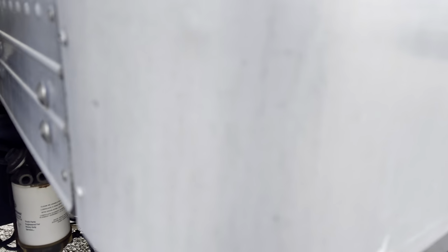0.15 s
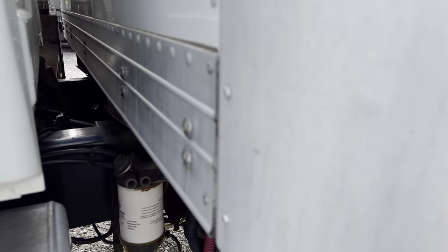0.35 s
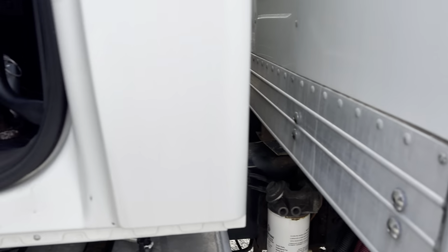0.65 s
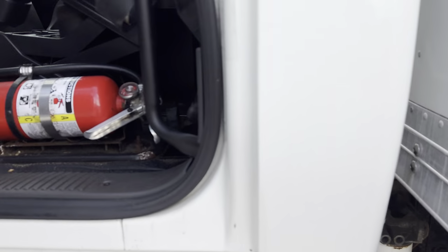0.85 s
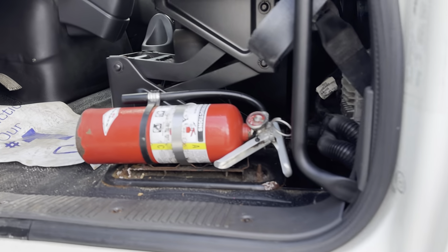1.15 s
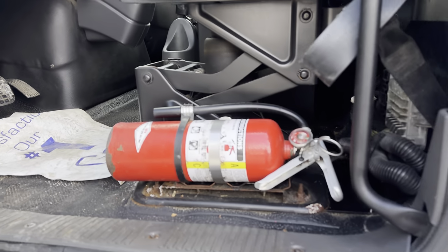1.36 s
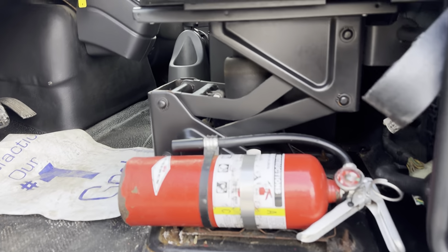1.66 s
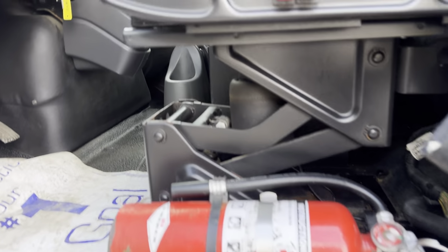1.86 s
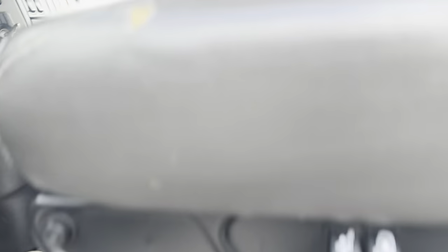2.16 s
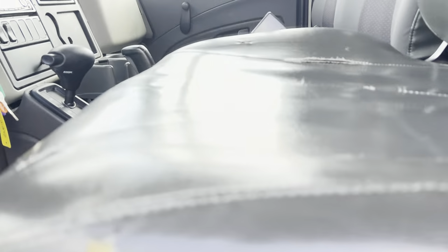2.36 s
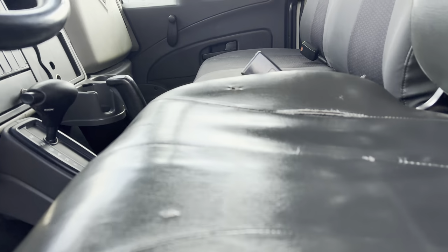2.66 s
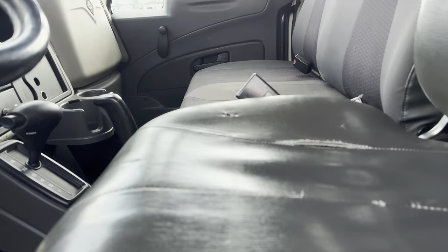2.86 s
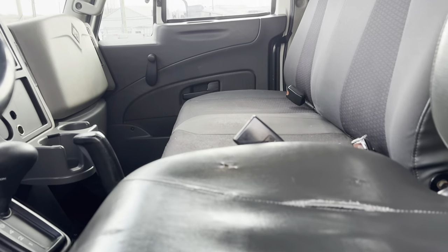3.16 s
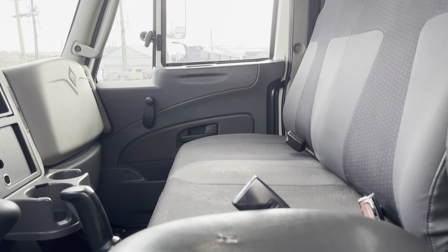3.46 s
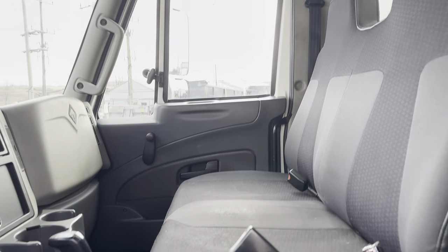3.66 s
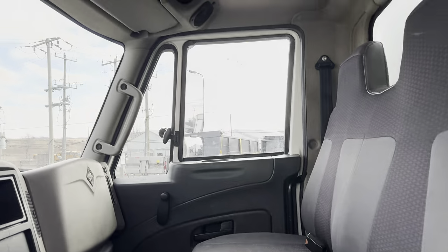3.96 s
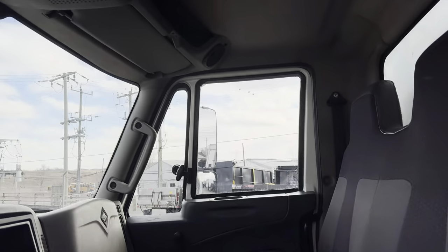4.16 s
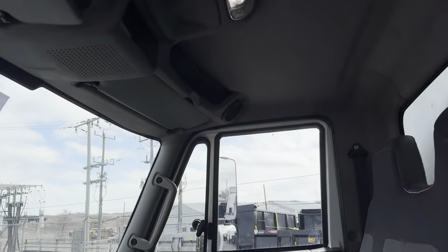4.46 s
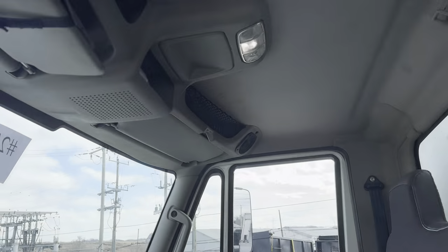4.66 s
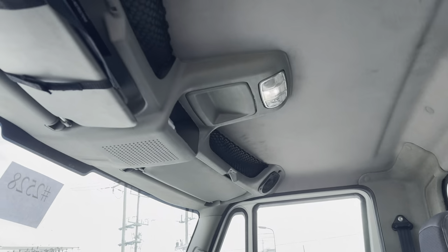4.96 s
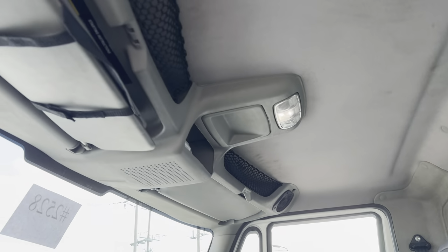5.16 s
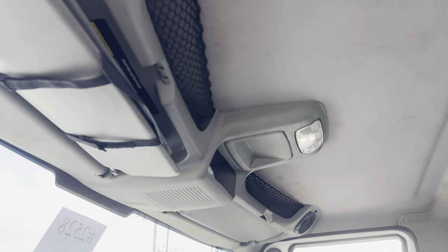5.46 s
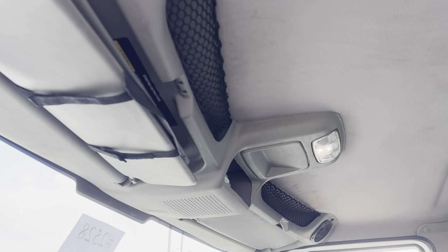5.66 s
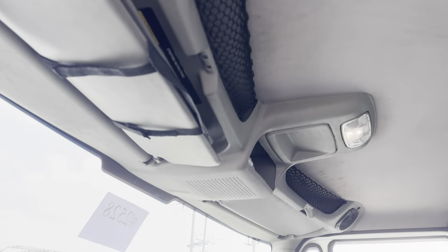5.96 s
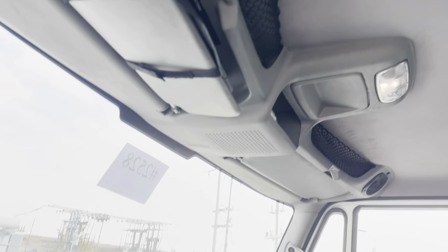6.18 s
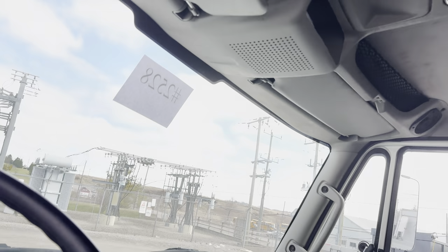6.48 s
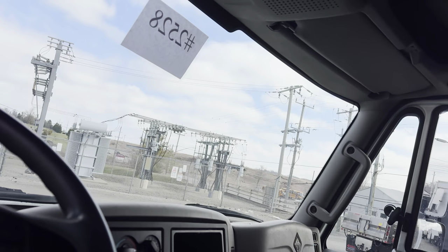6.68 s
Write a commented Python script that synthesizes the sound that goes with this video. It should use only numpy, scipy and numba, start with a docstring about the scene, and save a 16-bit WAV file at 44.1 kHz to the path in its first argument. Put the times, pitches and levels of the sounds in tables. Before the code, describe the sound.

A six-cylinder diesel idles steadily throughout, its firings a fast, uneven rattling roar at about 47 per second, with clatter, sizzle and a grainy high pulley hiss. At 0-0.2 s a wind burst rumbles and pops; light knocks on bodywork tap at 0.12-0.33 s, the strongest at 0.2. Around 0.6-1.6 s, passing an open gap, gear whines on the right and fan hum stand out, with a few harder diesel knocks at 1.04-1.24. Short gusts flutter at 1.5 and 1.8. From 2 to 2.8 s faint high belt chirps squeak far left. By 3 s the sound is inside the cab: darker, with low boom and softer clatter. Gusts pop at 3.4, 3.8 and 4.05. A thin bright click at 4.57 leads into the heaviest buffeting, 4.6-5.25, ended by dull, scuffing microphone bumps at 5.27-5.31. Afterwards comes calm muffled idle, with slight wind, to 6.8 s.

```python
"""A six-cylinder diesel truck idles on an open lot; a hand-held stereo microphone goes from beside it into the cab.
Engine: noise pulsed by the firings gives roar, clatter and sizzle, coloured by the open air and then by the cab.
Fan, whines of gears and cab, cab boom and transformers are wavering tones; a belt chirps and its pulley hisses.
Wind is filtered noise in gusts, with single eddies popping on the ports. Light knocks come at the start,
one sharp click sounds in the cab, and dull bumps on the housing end the strongest gust."""
import sys
import numpy as np
from scipy import signal
from scipy.fft import rfft, irfft
from scipy.io import wavfile
from scipy.ndimage import uniform_filter1d
from numba import njit

SR = 44100
rng = np.random.default_rng(int(sys.argv[2]) if len(sys.argv) > 2 else 0)


def dump(signal):
    """Clip the signal to [-1, 1] and save it as 16-bit WAV at the path in sys.argv[1]."""
    limited = np.clip(np.atleast_2d(signal).T, -1, 1)
    pcm = np.round(limited * 32767).astype(np.int16)
    wavfile.write(sys.argv[1], SR, pcm)


N = 300762
TIME = np.arange(N) / SR  # s
FREQS = np.maximum(np.arange(N // 2 + 1) * SR / N, 1)  # Hz

# Colours are spectrum shapes: only the differences between their levels count.
# Decays are times to fall by 60 dB.

# how alike the two microphone ports hear a spread source: pitch_hz, correlation (-1 to 1)
PORT_LIKENESS = [(60, 0.75), (320, 0.8), (480, 0.04), (750, -0.5), (950, 0.1), (1150, 0.46), (1700, -0.36),
                 (2400, 0.4), (3100, 0), (4300, 0.25), (6600, -0.2), (8600, -0.84), (12000, -0.23),
                 (15600, 0.5)]
# how a spread source leans to the left port: pitch_hz, left_minus_right_db
PORT_LEAN = [(100, 1.5), (330, 4), (520, 3), (750, 5), (1400, 3.5), (2400, -0.5), (3400, 4.5), (5200, 6),
             (6200, 4), (7300, 7.5), (9000, 0.5)]

# transformers near the lot
MAINS_HUM_HZ, MAINS_HUM_DB = 119.9, -39

# light breeze between gusts, weaker in the shelter of the doorway: time_s, level_db
BREEZE = [(0, -24), (2.0, -43), (2.2, -40), (3.1, -30), (3.3, -30.5), (5.3, -26), (5.6, -48), (6.82, -31)]
BREEZE_SWING_DB, BREEZE_HZ = -0.5, 139  # random swing; eddy corner
# gusts on the microphone: full_strength_s, hold_s, level_db, eddy_corner_hz
GUSTS = [(0.01, 0.18, -20.5, 250), (0.455, 0.014, -24.5, 130), (0.56, 0.049, -25.5, 217),
         (0.978, 0.025, -26, 150), (1.194, 0.42, -28, 312), (1.508, 0.063, -22, 241),
         (1.764, 0.28, -22.5, 250), (3.203, 0.52, -24.5, 129), (3.436, 0.02, -23, 78),
         (3.784, 0.043, -21.5, 128), (4.048, 0.084, -28.5, 144), (4.26, 0.53, -24, 99),
         (4.66, 0.064, -15, 198), (4.75, 0.4, -17, 90), (4.841, 0.17, -13, 200), (5.098, 0.088, -14, 176),
         (5.22, 0.075, -18.5, 210), (5.892, 0.032, -28.5, 130), (6.376, 0.32, -28.5, 106)]
GUST_ATTACK_S, GUST_RELEASE_S = 0.056, 0.023  # ramp ahead of full strength; fall by a factor e
# colour of eddies that push both ports alike: pitch_hz, level_db
SHARED_EDDIES = [(20, -15), (40, -9.5), (65, 4.5), (125, -1.0), (220, -3.0), (400, -1.0), (700, -4.0),
                 (5000, -22.5)]
# colour of eddies that push the ports opposite ways: pitch_hz, level_db
APART_EDDIES = [(20, -45), (40, -39), (65, -6.0), (120, -11.0), (400, -7.0), (800, 3.5), (1500, -29.5),
                (5000, -19)]
# single eddies popping on the ports: centre_s, pitch_hz, level_db, length_s
POPS = [(0.025, 250, -15, 0.036), (0.079, 333, -16.5, 0.019), (0.118, 100, -12.5, .022),
        (1.512, 130, -12, 0.05), (1.537, 190, -12, .012), (1.571, 310, -9.5, 0.016),
        (1.881, 350, -14, 0.023), (3.448, 76, -6.5, .04), (3.811, 148, -10.5, 0.023),
        (4.056, 148, -11.5, 0.029), (4.832, 327, -11.5, 0.014), (4.878, 410, -7.5, 0.011),
        (4.904, 100, -12, 0.025), (4.995, 90.5, -4, 0.029), (5.12, 75, -7, 0.058), (5.16, 282, -9.5, 0.028),
        (5.184, 264, -6.5, 0.011), (5.871, 275, -23.5, 0.019), (6.593, 240, -25, 0.026),
        (6.665, 276, -25.5, 0.022)]

# dull bumps against the microphone's housing: start_s, level_db, contact_s
BUMPS = [(5.268, -15, .0008), (5.276, -6, 0.00095), (5.289, -8, 0.0026), (5.298, -9, 0.0013),
         (5.309, -3.5, 0.0039)]
# modes of the housing: pitch_hz, relative level_db, decay_s
HOUSING = [(102, -5, .065), (237, 2, 0.031), (402, 1, 0.052), (560, -1, 0.043), (740, -7, 0.058),
           (1100, -4, 0.022)]
# scuffs that go with two of the bumps: start_s, level_db, decay_s
SCUFFS = [(5.2745, -7.5, 0.062), (5.297, -13.5, 0.041)]
# colour of the scuffs: pitch_hz, level_db
SCUFF_COLOUR = [(40, -22), (120, -1), (350, 12), (650, 0.5), (1100, -11), (1500, -13), (2400, -23.5),
                (4000, -44), (8000, -76)]

# a soft scuff, then light knocks on the bodywork: start_s, level_db, decay_s
KNOCKS = [(0.123, -30, 0.25), (0.165, -24, 0.099), (.2065, -18, 0.075), (.33, -35, .2)]
# colour of the knocks: pitch_hz, level_db
KNOCK_COLOUR = [(150, 16.5), (500, 3), (1000, -3), (1800, 2), (2700, -4.5), (4500, -8), (7500, -13),
                (9500, -28), (15000, -31)]
# the one click inside the cab
CLICK_S, CLICK_DB, CLICK_DECAY_S = 4.569, -34.5, 0.11
# colour of the click: pitch_hz, level_db
CLICK_COLOUR = [(2500, -30), (4300, 1), (6000, -8), (8500, -6), (11500, 2), (14000, -3.5), (16000, -3.5)]

# belt chirps: start_s, pitch_hz (mid-chirp), level_db (before panning), rise (share of the pitch)
CHIRPS = [(1.98, 4060, -53, .03), (2.1, 4120, -56, .04), (2.212, 3900, -50, .1), (2.324, 3860, -55, .07),
          (2.355, 3950, -53, .02), (2.462, 3960, -50, 0.11), (2.598, 3600, -57, .12),
          (2.74, 4000, -54, .15)]
# whining tones of gears and cab: pitch_hz, relative level_db
WHINES = [(524, -7.5), (570.3, -8.5), (691, -8.5), (1140, -16.5), (1234, -11.5), (1260, -17), (2114, -23)]
# the whines are heard plainly only while passing the open gap behind the cab
GAP_S, GAP_HALF_WIDTH_S, WHINES_GAP_DB, WHINES_DB = 1.03, 0.56, -34, -48
FAN_HZ = 156.8
# fan, loud by the gap and over the cab floor, faint under the roof: time_s, blade_db, octave_db
FAN_LEVEL = [(0, -46, -54), (.55, -44, -46), (.8, -40.5, -30.5), (1.3, -25.5, -26.5), (1.62, -39, -31.5),
             (1.85, -48, -32), (2.1, -46, -46), (2.35, -30.5, -35.5), (3.0, -33, -42.5), (3.6, -34.5, -51),
             (5.2, -38.5, -57), (5.6, -55, -67), (6.82, -51, -50)]
FIRING_HZ = 47.5
# cab standing waves, strongest at seat height: time_s, firing_tone_db, octave_db
BOOM_LEVEL = [(0, -46, -45), (1.75, -50, -38), (2.0, -48, -39), (2.27, -56, -43), (2.55, -30.5, -26.5),
              (3.1, -28, -29), (3.4, -26, -26.5), (4.7, -28, -32.5), (5.65, -35, -44), (6.1, -37, -47),
              (6.45, -35, -28.5), (6.82, -34, -41)]

# the walk along the truck and in through the door: time_s, engine reference level_db, inside_cab (0 to 1)
WALK = [(0, -35.5, .03), (.55, -35.5, 0.01), (1.15, -34.5, 0.03), (1.6, -36, 0.02), (2.3, -40.5, 0.24),
        (3.25, -42, 0.98), (4.2, -41, 0.97), (5.15, -40.5, 0.84), (5.7, -39, 1), (6.82, -42, 0.9)]
CLATTER_DB, CLATTER_CAB_DB = -8, -4.5  # against the engine reference; what the cab adds to that
# engine roar beside the truck: pitch_hz, level_db per Hz
ROAR_OUTSIDE = [(30, -44), (55, -38), (120, -0.5), (220, -11.5), (310, -2.5), (450, -11.5), (650, -18.5),
                (950, -14.5), (1300, -13), (1800, -21.5), (2400, -22.5), (3200, -33.5), (4200, -51)]
# engine roar in the cab: pitch_hz, level_db per Hz
ROAR_CAB = [(25, -28.5), (48, 8), (75, 6.5), (145, 5.5), (220, -3.5), (330, -5), (450, -10), (700, -11),
            (980, -9.5), (1300, -10), (1800, -20.5), (2250, -21), (3100, -28.5), (4200, -52.5)]
# clatter of injectors and valves: pitch_hz, level_db per Hz
CLATTER = [(1800, -38), (2600, -3), (3300, -2.5), (4100, 0.5), (4600, 2.5), (5200, -4.5), (5700, -7),
           (6300, -3.5), (7200, -6), (7900, -7), (8800, -23), (10000, -40)]
# sizzle above the clatter: pitch_hz, level_db per Hz
SIZZLE = [(6500, -27), (8500, -10.5), (10500, -11.5), (13000, -6.5), (15500, -3.5)]
# hollow ring of the bodywork, shifting as the microphone moves: time_s, centre_hz, level_db
HOLLOW = [(0, 560, -38), (.6, 580, -41), (.8, 565, -35), (1.3, 590, -32.5), (2.1, 574, -36.5),
          (3.3, 554, -44), (5.3, 565, -40.5), (5.8, 550, -69), (6.05, 536, -49), (6.42, 524, -37.5),
          (6.82, 567, -41.5)]
HOLLOW_OVERTONE, HOLLOW_OVERTONE_DB = 1.453, -1  # ratio to the centre; level against it
# firings that knock harder than the rest: start_s, level_db
HARD_FIRINGS = [(1.041, -27), (1.165, -20), (1.243, -17)]
# colour of the hard firings: pitch_hz, level_db
HARD_COLOUR = [(200, -20), (550, 10), (900, -4), (1400, -1), (2500, -32), (4500, -27), (9000, -48)]
HARD_DECAY_S = 0.04

TOP_HZ = 15850  # top of the recorder's band


def undb(db):
    """Decibels to gain."""
    return 10 ** (np.asarray(db) / 20)


def curves(table):
    """Each column of a table as a course in time, joined by straight lines."""
    s, *columns = np.transpose(table)
    return [np.interp(TIME, s, c) for c in columns]


def over_hz(points):
    """Points joined on a log-frequency axis."""
    hz, value = np.transpose(points)
    return np.interp(np.log(FREQS), np.log(hz), value)


def unit(x):
    """Scale to rms 1."""
    return x / np.sqrt(np.mean(x ** 2))


def walk(rate):
    """Random course of rms 1: levels held 1 / rate s and slewed twice."""
    k = int(SR / rate)
    held = np.repeat(rng.standard_normal(N // k + 1), k)
    slewed = uniform_filter1d(uniform_filter1d(held, k), k)
    return unit(slewed[:N])


def pan(x, lean_db):
    """Place a sound between left and right; a positive lean is to the left."""
    return x * undb(np.array([[lean_db], [-lean_db]]) / 2)


def ports(pair, colour):
    """Colour two unrelated noises and spread them over the ports; the centre keeps rms 1."""
    mid, side = rfft(pair) * undb(over_hz(colour))
    likeness = np.clip(over_hz(PORT_LIKENESS), -.9, .99)
    side = side * np.sqrt((1 - likeness) / (1 + likeness))
    lean = undb(over_hz(PORT_LEAN) / 2)
    out = irfft(np.array([(mid + side) * lean, (mid - side) / lean]), N)
    return out / np.std(out.mean(axis=0))


@njit
def low_pass(x, hz, damping):
    """State-variable low-pass with a moving corner."""
    y, band, low = np.empty(len(x)), 0., 0.
    for i in range(len(x)):
        g = np.tan(np.pi * hz[i] / SR)
        v = (band + g * (x[i] - low)) / (1 + g * (g + damping))
        y[i] = low + g * v
        band, low = 2 * v - band, low + 2 * g * v
    return y


def strike(s, db, decay_s, colour, rise_s):
    """A contact: a dense ring that builds over the time of the push and dies away."""
    age = np.maximum(TIME - s, 0)
    push = np.sin(np.pi / 2 * np.minimum(age / rise_s, 1)) ** 2
    fall = np.exp(-np.log(1000) * age / decay_s)
    return undb(db) * push * fall * ports(rng.standard_normal((2, N)), colour)


def hum(lines, waver_db, wander, lean_db):
    """Steady tones whose strength (dB) and phase (wander, radians) waver a little."""
    out = 0
    for hz, db in lines:
        phase = 2 * np.pi * (hz * TIME + rng.random()) + wander * walk(6)
        out = out + np.sqrt(2) * undb(db + waver_db * walk(15)) * np.sin(phase)
    return pan(out, lean_db)


def passing_gap():
    """How near the microphone is to the open gap behind the cab, 0 to 1."""
    return np.exp(-((TIME - GAP_S) / GAP_HALF_WIDTH_S) ** 4)


def transformers():
    """Hum of nearby transformers at about twice the mains frequency, 4 dB stronger by the gap."""
    level_db = MAINS_HUM_DB + 4 * passing_gap()
    return hum([(MAINS_HUM_HZ, level_db)], waver_db=2.5, wander=.15, lean_db=-2.5)


def airflow():
    """Wind level (dB) and eddy corner (Hz): gusts rise, hold and die over the breeze; the strongest weighs most."""
    power = undb(curves(BREEZE)[0] + BREEZE_SWING_DB * walk(9.9)) ** 2
    weighted_hz = BREEZE_HZ * power
    for s, hold, db, hz in GUSTS:
        attack = np.clip(1 + (TIME - s) / GUST_ATTACK_S, 0, 1)
        release = np.exp(-np.maximum(TIME - s - hold, 0) / GUST_RELEASE_S)
        gust = (undb(db) * attack * release) ** 2
        power = power + gust  # gusts add in power
        weighted_hz = weighted_hz + hz * gust
    return 10 * np.log10(power), weighted_hz / power


def wind(damping=1.01):
    """Eddies push on the ports as low-passed noise: one part on both alike, one in opposite senses."""
    gust_db, corner_hz = airflow()
    corner_hz = np.clip(corner_hz * np.exp(.16 * walk(90)), 30, 2000)

    def eddies(colour):
        noise = irfft(rfft(rng.standard_normal(N)) * undb(over_hz(colour)), N)
        return low_pass(noise, corner_hz, damping)

    mid, side = eddies(SHARED_EDDIES), eddies(APART_EDDIES)
    # the airflow alone sets the strength, whatever the size of its eddies
    strength = np.sqrt(uniform_filter1d(mid ** 2, int(0.041 * SR)))
    return np.array([mid + side, mid - side]) / strength * undb(gust_db)


def pops():
    """A single eddy crosses the ports: pressure swings that swell and stop, alike on both."""
    out = np.zeros(N)
    for s, hz, db, length in POPS:
        swell = np.cos(np.pi * np.clip((TIME - s) / length, -.5, .5)) ** 2
        out += undb(db) * swell * np.sin(2 * np.pi * (hz * (TIME - s) + rng.random()))
    return out


def bumps():
    """Soft bumps ring the microphone's housing, longer contacts only its low modes; scuffs go with two of them."""
    out = np.zeros(N)
    age = np.arange(SR // 5) / SR
    ring = 0
    for hz, db, decay_s in HOUSING:
        ring = ring + undb(db) * np.sin(2 * np.pi * hz * age) * np.exp(-np.log(1000) * age / decay_s)
    for s, db, contact_s in BUMPS:
        push = np.hanning(int(contact_s * SR))
        thump = np.convolve(ring, push / push.sum())
        start = int(s * SR)
        out[start:start + len(thump)] += undb(db) * thump
    return out + sum(strike(s, db, decay_s, SCUFF_COLOUR, rise_s=0.0019) for s, db, decay_s in SCUFFS)


def knocks():
    """A soft scuff, light knocks on the bodywork and a thin, bright click in the cab."""
    body = sum(strike(s, db, decay_s, KNOCK_COLOUR, rise_s=0.001) for s, db, decay_s in KNOCKS)
    return body + strike(CLICK_S, CLICK_DB, CLICK_DECAY_S, CLICK_COLOUR, rise_s=0.0027)


def belt(length_s=0.041):
    """The belt slips in short, rough, rising chirps, far to the left."""
    out = np.zeros(N)
    roughness = .6 * walk(700)  # radians
    for s, hz, db, rise in CHIRPS:
        along = np.clip((TIME - s) / length_s, 0, 1)
        pitch = hz * (1 + rise * (along - .5))
        phase = 2 * np.pi * np.cumsum(pitch) / SR + roughness
        out += undb(db) * np.sin(np.pi * along) * np.sin(phase)
    return pan(out, 21)


def pulley(hz=7170, db=-14.0, flicker_db=6.0, swells_hz=11.0, swing_db=2.5):
    """A dry pulley hisses in a narrow, grainy band of unsteady pitch that swells about eleven times a second."""
    phase = 2 * np.pi * np.cumsum(hz + 150 * walk(45)) / SR
    hiss = unit(walk(800) * np.sin(phase) + walk(800) * np.cos(phase))
    swell_db = swing_db * np.cos(2 * np.pi * swells_hz * TIME + walk(3.9))
    burst_db = flicker_db * np.minimum(walk(55), 1.5)
    return pan(hiss * undb(db + swell_db + burst_db), 8)


def whines():
    """Whining tones of gears and cab at a set of steady pitches, to the right, plainest by the gap."""
    level_db = WHINES_DB + (WHINES_GAP_DB - WHINES_DB) * passing_gap()
    return hum(WHINES, waver_db=1.5, wander=0.9, lean_db=-11.0) * undb(level_db)


def fan():
    """Fan blades chop the air: a blade tone and its octave."""
    blade_db, octave_db = curves(FAN_LEVEL)
    return hum([(FAN_HZ, blade_db), (2 * FAN_HZ, octave_db)], waver_db=1.6, wander=.3, lean_db=2.5)


def boom():
    """Standing waves of the cab boom at the firing rate and its octave."""
    firing_db, octave_db = curves(BOOM_LEVEL)
    return hum([(FIRING_HZ, firing_db), (2 * FIRING_HZ, octave_db)], waver_db=1.1, wander=.18, lean_db=1.2)


def hard_firings():
    """Diesel knock that stands out while passing the open gap behind the cab."""
    return sum(strike(s, db, HARD_DECAY_S, HARD_COLOUR, rise_s=0.0018) for s, db in HARD_FIRINGS)


def panel_modes(x, spacing_hz, depth_db, shift_hz):
    """Block and panels ring at many close pitches, mostly midrange; two such patterns trade places slowly."""
    knots = np.arange(0, SR / 2, spacing_hz)
    midrange = FREQS / (FREQS + 400) / (1 + (FREQS / 2500) ** 2)

    def pattern():
        ripple = np.interp(FREQS, knots, rng.standard_normal(len(knots)))
        return irfft(rfft(x) * undb(depth_db * ripple * midrange), N)

    here, there = pattern(), pattern()
    share = np.sin(np.pi * shift_hz * TIME) ** 2
    return here * share + there * (1 - share)


def firings(depth, decay, scatter_db, limp, repeat):
    """Firings rattle the block, strong and weak in turn; part of the rattle comes back alike every six firings."""
    turns = TIME * FIRING_HZ
    shot = turns.astype(int)
    scatter = undb(scatter_db * rng.uniform(-3.1, 1, shot[-1] + 1))
    size = scatter[shot] * (1 + limp * (-1) ** shot)
    blow = 1 + depth * size * np.exp(-(turns % 1) / decay)  # decay is a share of the firing period
    blow = uniform_filter1d(blow, size=90)  # about 2 ms
    in_cycle = (TIME % (6 / FIRING_HZ) * SR).astype(int)
    share = np.clip(repeat, 0, 1)
    alike, fresh = rng.standard_normal((2, 2, N))
    rattle = blow * (np.sqrt(share) * alike[:, in_cycle] + np.sqrt(1 - share) * fresh)
    return panel_modes(rattle, spacing_hz=23.95, depth_db=5.0, shift_hz=0.315)


def rattle_bands(x, centres_hz, rate, flicker_db):
    """Different parts of the engine stand out in turn: each band flickers on its own."""
    spectrum, out = rfft(x), 0
    for band in np.eye(len(centres_hz)):
        part = irfft(spectrum * np.interp(FREQS, centres_hz, band), N)
        out = out + part * undb(flicker_db * walk(rate))
    return out


def hollow(blows, damping=0.32):
    """The firings ring two broad air resonances of the bodywork, louder on the left."""
    centre_hz, db = curves(HOLLOW)

    def ring(hz):
        # the slope of a resonant low-pass leaves a band around its corner
        return unit(np.array([np.gradient(low_pass(b, hz, damping)) for b in blows]))

    both = ring(centre_hz) + undb(HOLLOW_OVERTONE_DB) * ring(centre_hz * HOLLOW_OVERTONE)
    band = signal.butter(2, [350, 1100], "bandpass", fs=SR, output="sos")
    return pan(signal.sosfilt(band, both), lean_db=2.5) * undb(db)


def engine():
    """Roar, clatter and sizzle of the firings; the cab swaps the open-air colour for its own."""
    engine_db, inside = curves(WALK)
    inside = np.clip(inside, 0, 1)
    clatter_db = engine_db + CLATTER_DB + CLATTER_CAB_DB * inside

    blows = firings(depth=0.52, decay=0.26, scatter_db=7, limp=0.26, repeat=0.2)
    roar_centres_hz = (400, 700, 1000, 1400, 1900, 2500)
    roar = rattle_bands(ports(blows, ROAR_OUTSIDE), roar_centres_hz, rate=70, flicker_db=1.4)
    outdoors = np.sqrt(1 - inside) * undb(7.0) * roar
    cab = np.sqrt(inside) * undb(8.0) * ports(blows, ROAR_CAB)

    ticks = firings(depth=.66, decay=.42, scatter_db=2.5, limp=.3, repeat=.12)
    clatter_centres_hz = (2500, 3500, 4500, 5800, 7200, 8500)
    clatter = rattle_bands(ports(ticks, CLATTER), clatter_centres_hz, rate=45, flicker_db=1.1) * undb(-.5)

    fine_ticks = firings(depth=.3, decay=.3, scatter_db=2.0, limp=.3, repeat=.05)
    # the shortest waves bend least round the door frame
    sizzle = ports(fine_ticks, SIZZLE) * undb(-6.5 - 7.0 * inside)

    bright = (clatter + sizzle + pulley()) * undb(clatter_db)
    return (outdoors + cab) * undb(engine_db) + hollow(blows) + bright


def scene():
    """Everything that reaches the microphone; the pulley and the hollow ring come with the engine."""
    air = transformers() + wind() + pops()
    contacts = bumps() + knocks()
    truck = belt() + whines() + fan() + boom() + hard_firings() + engine()
    return air + contacts + truck


def record(dry):
    """The recorder rounds the loudest peaks and cuts the top."""
    rounded = dry / (1 + dry ** 6) ** (1 / 6)
    top_cut = signal.ellip(10, .1, 80, TOP_HZ, fs=SR, output="sos")
    return signal.sosfilt(top_cut, rounded)


dry = scene()
out = record(dry)
dump(out)
```